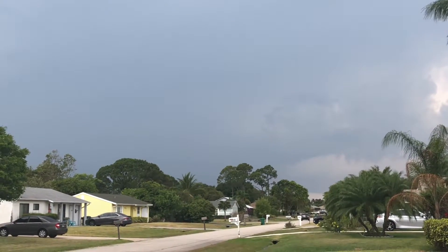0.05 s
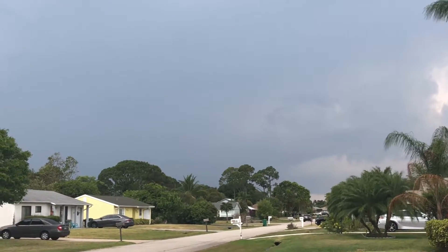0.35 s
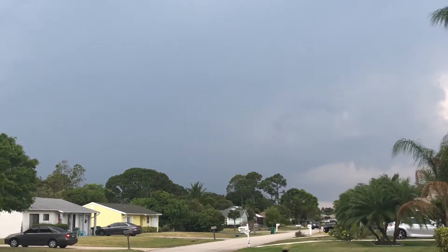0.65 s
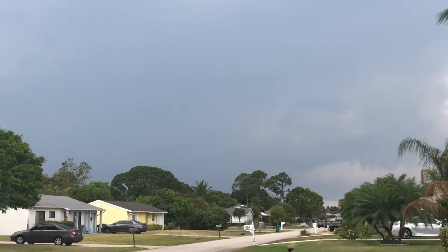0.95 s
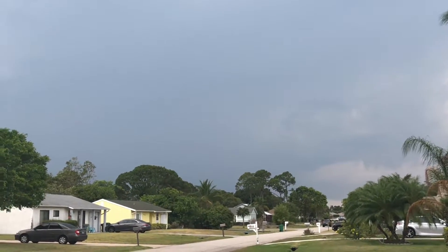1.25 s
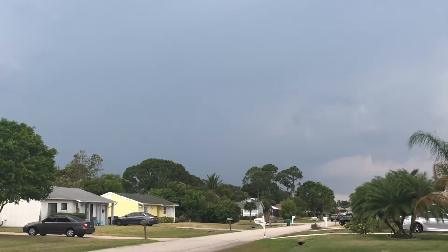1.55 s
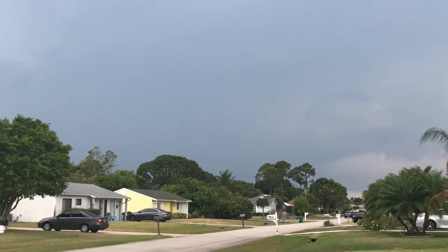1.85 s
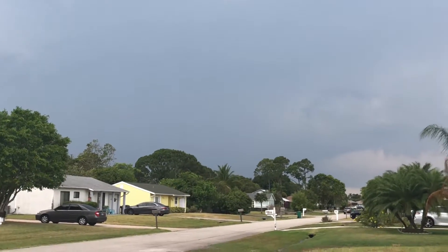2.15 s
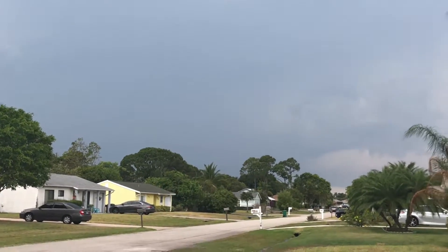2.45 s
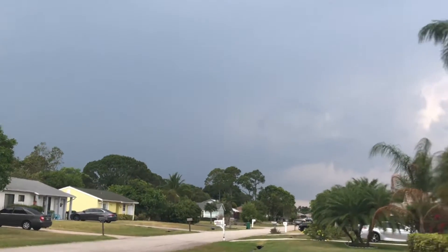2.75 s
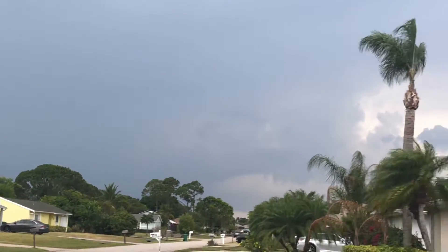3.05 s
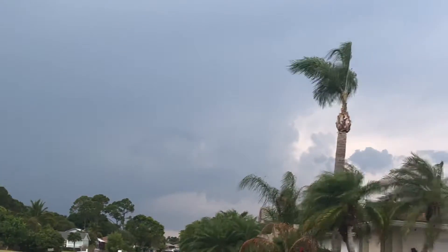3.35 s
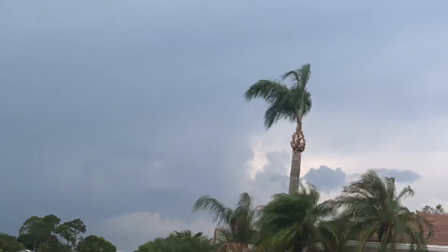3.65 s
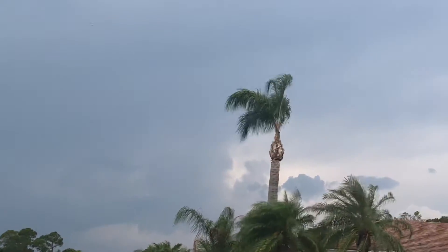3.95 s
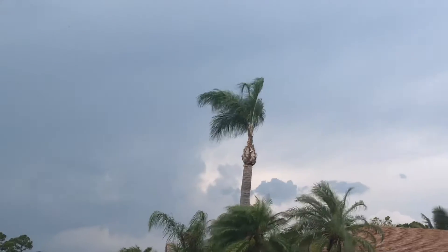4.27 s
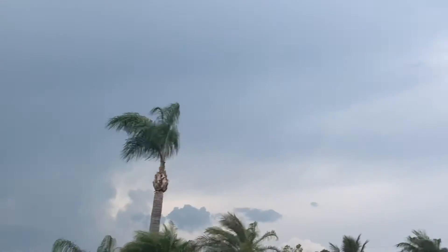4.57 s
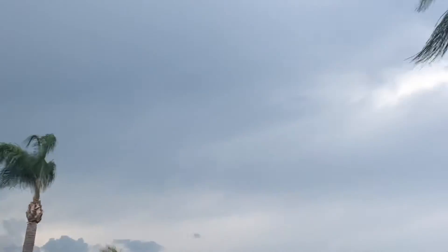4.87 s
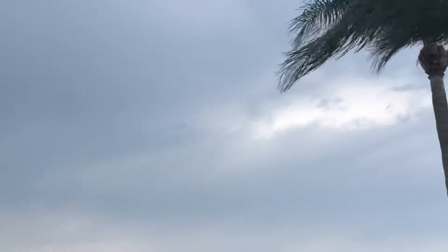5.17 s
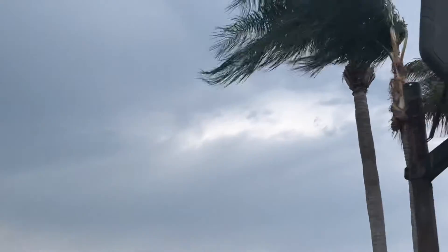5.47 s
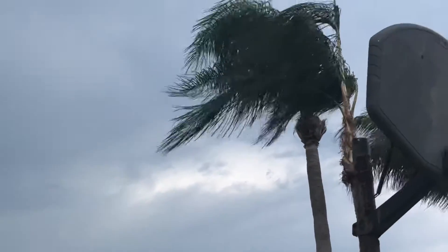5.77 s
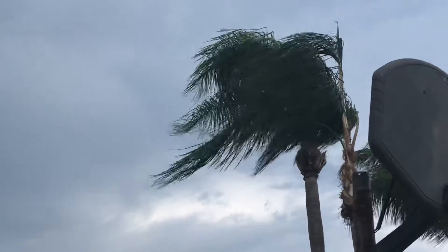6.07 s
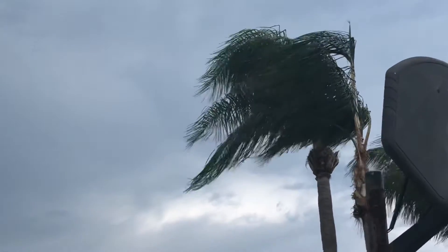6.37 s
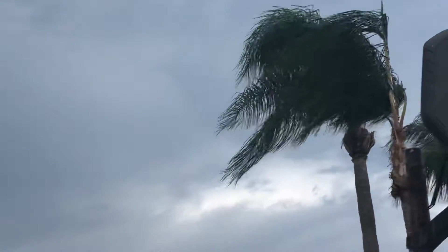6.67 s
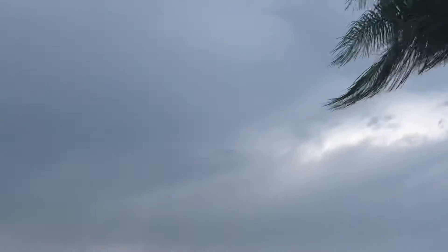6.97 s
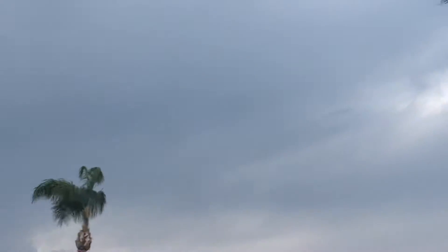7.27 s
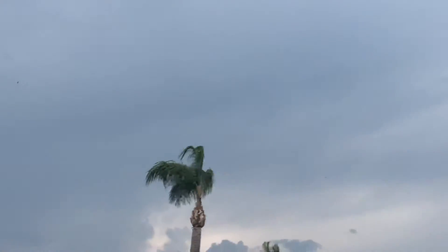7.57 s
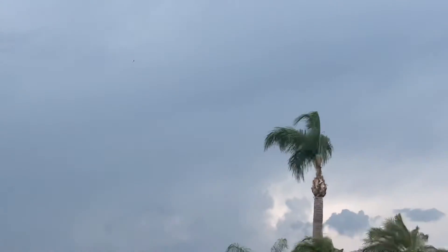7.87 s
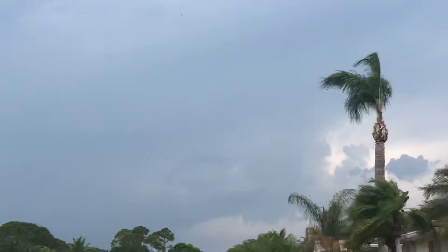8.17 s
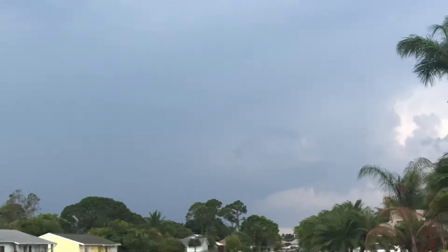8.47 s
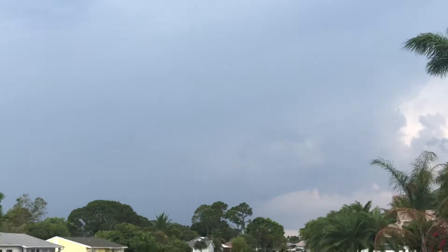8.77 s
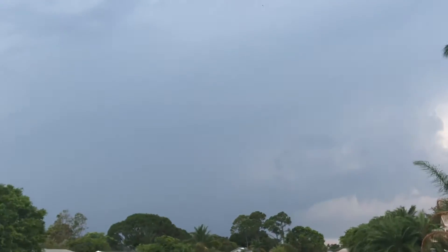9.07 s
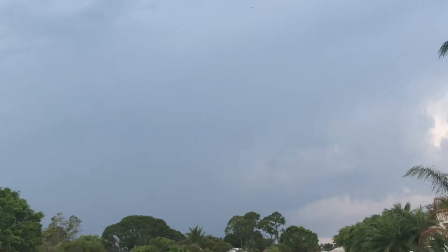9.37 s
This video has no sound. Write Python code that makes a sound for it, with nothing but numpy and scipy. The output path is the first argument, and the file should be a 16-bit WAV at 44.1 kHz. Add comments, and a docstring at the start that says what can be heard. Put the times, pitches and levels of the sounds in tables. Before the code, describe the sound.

Palm trees rustle steadily in the wind, with soft microphone flutter that builds into rough, thumping gusts and dies back.

```python
"""Storm wind on a palm-lined street, heard from a hand-held phone.
Throughout, fronds hiss and patter over the low roar of the wind; near 1 s it moans faintly.
Up to 6 s, turbulent air flutters softly across the microphone port.
From 6.5 s, hard gusts drive thumping eddies against the port while the nearest palm sizzles.
By 9 s the gusts have died back to a draught."""
import sys
import numpy as np
from scipy import signal
from scipy.fft import rfft, irfft
from scipy.io import wavfile
from scipy.ndimage import uniform_filter1d, map_coordinates

SR = 44100
rng = np.random.default_rng(int(sys.argv[2]) if len(sys.argv) > 2 else 0)


def dump(signal):
    """Clip the signal to [-1, 1] and save it as 16-bit WAV at the path in sys.argv[1]."""
    limited = np.clip(np.atleast_2d(signal).T, -1, 1)
    pcm = np.round(limited * 32767).astype(np.int16)
    wavfile.write(sys.argv[1], SR, pcm)


N = 419832
T = np.arange(N) / SR


def buffet(air_db, swirl_db=1.32, lurch_octaves=0.21, gain_db=0.85, calm_db=-59):
    """Turbulence swept past the port: faster air is louder and higher."""
    # turbulence spectrum at reference speed: freq_hz, density_db
    turbulence = [(15, -17), (45, 6), (85, 4.5), (160, 4), (280, -2), (450, -12.5), (650, -18),
                  (900, -26.5), (1300, -38.5), (2000, -74), (3000, -100)]
    speed = air_speed(air_db) * 2 ** (lurch_octaves * walk(110))  # lurching flow sputters
    pattern = colour(rng.standard_normal(2 * N), turbulence)
    pressure = port(map_coordinates(pattern, [np.cumsum(speed)], order=3, mode="wrap"))
    running_rms = np.sqrt(uniform_filter1d(pressure ** 2, size=2600) + 1e-9)
    strength = undb(air_db + gain_db + swirl_db * walk(45))
    turbulent_share = 1 / (1 + undb(calm_db - air_db) ** 2)  # flow turns smooth in near calm
    return pressure / running_rms * strength * turbulent_share


def eddies(air_db, rise_cycles=0.23, fall_cycles=0.71, slowing_per_cycle=0.35,
           strike_db=-2.0, flutter_db=-10, shred_hz=450):
    """Each eddy strikes the port with one fast, slowing swing and tears into a flutter of like pitch."""
    # distinct eddies: time_s, level_db, pitch_hz, flutter_half_length_s
    distinct = [(0.029, -34, 102, 0.01), (0.074, -37, 70, 0.0087), (0.225, -33, 131, 0.0053),
                (0.558, -29, 127, 0.0095), (0.601, -46, 318, .003), (1.078, -39, 115, 0.013),
                (2.381, -39, 137, 0.0064), (2.682, -33, 195, 0.004), (2.784, -36.5, 125.2, 0.0055),
                (2.838, -39, 224, 0.0023), (2.893, -29, 264, 0.0034), (2.898, -32, 119, 0.0055),
                (3.844, -32.5, 175, 0.005), (4.05, -37, 140, 0.0085), (5.055, -44.5, 110, .012),
                (5.145, -45, 99, .012), (5.545, -39, 124, 0.0046), (5.638, -35, 233, 0.0084),
                (5.664, -33, 206.1, 0.0059), (5.684, -32, 115, 0.0055), (5.715, -31, 256, 0.0067),
                (5.724, -29, 440, 0.0013), (5.746, -30, 216, 0.0031), (5.885, -35, 229, 0.0056),
                (5.991, -39, 138, 0.0092), (6.163, -43, 278, 0.0034), (6.218, -30, 330, 0.0024),
                (6.243, -38, 403, .009), (6.252, -26, 183.6, 0.0054), (6.409, -29, 230, 0.0038),
                (6.425, -35.5, 156, .006), (6.482, -33.5, 303, 0.0022), (6.532, -30.5, 243, .005),
                (6.551, -29, 480, .0015), (6.566, -23, 250, .004), (6.581, -13, 470, 0.0031),
                (6.605, -20, 430, .002), (6.621, -11, 559, 0.0013), (6.643, -7.5, 380, 0.0024),
                (6.662, -26, 1070, 0.00055), (6.666, -15, 497, 0.0021), (6.689, -16.5, 178, 0.0041),
                (6.698, -10.5, 933, 0.0015), (6.705, -16, 130, 0.005), (6.715, -13, 355, 0.0022),
                (6.736, -13, 230, 0.0032), (6.746, -28, 600, .003), (6.767, -20, 590, .003),
                (6.775, -11, 400, 0.0029), (6.801, -29, 125, .004), (6.821, -23, 360, 0.0058),
                (6.838, -25, 447, 0.0015), (6.848, -26, 450, 0.0017), (6.863, -15, 410, 0.0059),
                (6.879, -12, 310, 0.0034), (6.881, -24.5, 650, .004), (6.9, -15.5, 296, .005),
                (6.912, -22.5, 779.5, 0.00048), (6.916, -13.5, 240, 0.0014), (6.934, -16.5, 430, .0022),
                (6.953, -19.5, 362, 0.0066), (7.037, -28.5, 378, 0.0014), (7.066, -14.5, 480, 0.0014),
                (7.082, -20, 514, 0.0038), (7.092, -19, 435, 0.0031), (7.18, -8.5, 480, 0.0018),
                (7.215, -15, 1020, 0.00069), (7.217, -13.5, 298, 0.0049), (7.23, -12.5, 550, 0.0016),
                (7.237, -11, 600, 0.0014), (7.25, -18, 302, .003), (7.279, -18, 250.8, 0.0034),
                (7.282, -18.5, 594, 0.0067), (7.302, -19, 675, 0.003), (7.373, -20.5, 480, 0.002),
                (7.381, -14.5, 149, 0.0037), (7.397, -19, 470, 0.0016), (7.449, -23, 260.5, .004),
                (7.465, -21.5, 523, 0.00072), (7.469, -20, 240, 0.0017), (7.491, -21, 460, 0.0014),
                (7.555, -31.5, 418, 0.004), (7.563, -31, 181, 0.0045), (7.625, -30, 74.8, 0.0067),
                (7.732, -31.5, 329.4, .005), (7.774, -24, 486.7, .0016), (7.787, -19.5, 251, 0.0019),
                (7.798, -18, 100, 0.0053), (7.806, -19.5, 260, 0.0021), (8.093, -30, 399.5, 0.0039),
                (8.118, -19.5, 367, 0.0014), (8.128, -27, 125.5, 0.0044), (8.15, -29, 125.3, 0.0058),
                (8.18, -25, 364, .0014), (8.206, -33, 380, 0.0011), (8.236, -34, 430, 0.0054),
                (8.254, -15.5, 175.7, 0.0053), (8.31, -30, 417, 0.0023), (8.355, -19.5, 443, 0.0016),
                (8.368, -28.5, 451, 0.0041), (8.387, -25, 400, 0.0027), (8.407, -26, 181, 0.0047),
                (8.432, -26.5, 396, 0.01), (8.447, -22, 631.6, 0.0012), (8.449, -14.5, 293, 0.0026),
                (8.46, -26, 560, 0.0011), (8.464, -12.5, 351.6, 0.0036), (8.471, -19, 417, 0.0016),
                (8.483, -18.5, 518.4, 0.0015), (8.486, -30, 178, 0.0026), (8.504, -23.5, 251, .003),
                (8.537, -24, 275.6, 0.0056), (8.548, -30, 556, 0.0017), (8.565, -23, 457, .002),
                (8.569, -24, 260, 0.0027), (8.692, -32.5, 490, 0.002), (8.705, -21, 198.9, 0.0031),
                (8.709, -25.5, 438.5, 0.0019), (8.728, -36, 178, 0.0045), (8.748, -32, 330, 0.0021),
                (8.896, -39, 290, 0.0021), (8.941, -26, 178.7, 0.005)]
    rows = [*small_eddies(air_db), *distinct]
    shreds = unit(butterworth(rng.standard_normal(N), 4, [shred_hz / 2, shred_hz * 1.543], "band"))
    phases = rng.uniform(0, 2 * np.pi, len(rows))
    out = np.zeros(N)
    for (time_s, level_db, pitch_hz, half_s), phase in zip(rows, phases):
        near = slice(*np.searchsorted(T, [time_s - 0.04, time_s + 0.04]))
        age_s = T[near] - time_s
        cycles = age_s * pitch_hz
        bounded = np.maximum(cycles, -8)
        slowed = (1 - np.exp(-slowing_per_cycle * bounded)) / slowing_per_cycle
        envelope = 2 / (np.exp(-bounded / rise_cycles) + np.exp(bounded / fall_cycles))
        strike = envelope * np.cos(2 * np.pi * slowed + phase)
        tuned_shreds = map_coordinates(shreds, [SR * (time_s + cycles / shred_hz)], order=1, mode="wrap")
        flutter = tuned_shreds / np.cosh(age_s / half_s)
        out[near] += undb(level_db + strike_db) * strike + undb(level_db + flutter_db) * flutter
    return port(out)


def small_eddies(air_db, count=400, offset_db=-2.5, scatter_db=1.5, ceiling_db=-24,
                 reference_hz=430, scatter_octaves=0.22, flutter_cycles=0.8):
    """Rows of lesser eddies at random times, stronger and higher in faster air."""
    at = ((np.arange(count) + rng.random(count)) * N / count).astype(int)
    strength, pitch = np.clip(rng.standard_normal((count, 2)), -2, 2).T
    pitch_hz = reference_hz * air_speed(air_db[at]) * 2 ** (scatter_octaves * pitch)
    level_db = np.minimum(air_db[at] + offset_db + scatter_db * strength, ceiling_db)
    return np.column_stack([T[at], level_db, pitch_hz, flutter_cycles / pitch_hz])


def airflow_db():
    """Pressure level on the microphone: gusts ride on a draught."""
    # draught: time_s, level_db
    draught = [(0.0, -53.5), (0.7, -54), (1.6, -56.5), (2.55, -51.0), (3.1, -55.5), (4.05, -53),
               (5.4, -56.0), (5.95, -45.0), (6.5, -44.5), (7.5, -39.5), (7.94, -49.0), (8.16, -36.0),
               (8.65, -45.5), (9.03, -55.5), (9.52, -49.0)]
    # gusts: time_s, peak_db, half_length_s
    gusts = [(0.054, -46, 0.051), (0.59, -42.5, 0.065), (2.42, -50, 0.13), (2.777, -46, 0.073),
             (5.555, -44.5, 0.062), (5.699, -38, 0.067), (6.421, -41, 0.028), (6.605, -27, 0.05),
             (6.693, -22.5, 0.04), (6.79, -24.5, 0.086), (6.891, -23.5, 0.046), (6.955, -25.5, 0.02),
             (7.085, -29.5, 0.025), (7.182, -26.5, 0.029), (7.23, -23.5, 0.027), (7.28, -28, 0.038),
             (7.39, -27, 0.025), (7.458, -30, 0.043), (7.566, -35, 0.01565), (7.621, -37, 0.019),
             (7.785, -32.5, 0.042), (8.128, -32.5, 0.033), (8.367, -33, 0.063), (8.471, -29.5, 0.058),
             (8.558, -30, 0.026), (8.715, -33, 0.053), (8.945, -39.5, 0.029)]
    return 20 * np.log10(np.hypot(undb(curve(draught)), swells(gusts)))


def air_speed(air_db, reference_db=-22.5, db_per_doubling=23, slowest=0.26):
    """Relative air speed from pressure level; never zero."""
    return np.hypot(2 ** ((air_db - reference_db) / db_per_doubling), slowest)


def fronds(sway_db=0.27, flutter_db=0.43, dull_hz=2300, bright_hz=7200):
    """Air in the crowns: far trees merge into a dull rush, near blades and tips sway independently."""
    # frond hiss spectrum: freq_hz, density_db
    spectrum = [(300, -3.5), (700, 1.15), (1200, 1.33), (2000, 2.5), (2700, -0.5), (3600, -0.5), (5500, -2),
                (8000, -7), (10000, -9.5), (13000, -15), (16000, -15.5)]
    # hiss of the near crowns: time_s, level_db
    crown_levels = [(0.0, -58), (0.19, -56.5), (0.54, -59), (0.85, -54.5), (1.12, -56.3), (1.52, -53.5),
                    (1.68, -55.5), (2.12, -52.5), (2.27, -55), (2.65, -53), (3.48, -52.5), (3.68, -55),
                    (4.0, -54.5), (4.62, -52), (5.4, -54.5), (6.3, -54), (6.65, -54.5), (7.62, -54),
                    (8.2, -56), (8.5, -58.5), (8.9, -55.5), (9.52, -57)]
    # sizzle of the leaflet tips: time_s, level_db
    tip_levels = [(0, -54.5), (0.26, -54), (0.56, -56), (0.8, -53), (1.17, -53.5), (1.56, -51.5),
                  (2.3, -52), (3.4, -48.5), (3.65, -51.5), (4.42, -50.5), (4.54, -49), (6.15, -48.5),
                  (6.89, -48.5), (7.15, -50), (7.33, -47), (7.43, -49.5), (7.62, -48.5), (8.5, -54),
                  (8.94, -52.5), (9.52, -54.5)]
    # rush of the far trees: time_s, level_db
    far_levels = [(0, -57.5), (0.45, -58.5), (1.0, -56.5), (2.0, -55.5), (2.6, -54.5), (3.85, -55),
                  (4.65, -54), (6.3, -52.5), (7.9, -53), (8.55, -58), (9.52, -56.5)]
    lowpass = signal.butter(2, dull_hz, fs=SR, output="sos")
    far = signal.sosfiltfilt(lowpass, colour(rng.standard_normal(N), spectrum))
    blades = butterworth(rustle(spectrum), 2, [dull_hz, bright_hz], "band")
    tips = butterworth(rustle(spectrum), 3, bright_hz, "high")
    out = far * undb(curve(far_levels))
    for part, levels in [(blades, crown_levels), (tips, tip_levels)]:
        out += part * undb(curve(levels) + sway_db * walk(9.1) + flutter_db * walk(40))
    return out


def rustle(spectrum, patter_db=-3, scrape_decay_s=0.0075, flurry_db=0.9):
    """Air hisses while leaflets tick and rub in flurries."""
    scrape = rng.standard_normal(SR // 50) * np.exp(-T[:SR // 50] / scrape_decay_s)
    rubs = unit(signal.fftconvolve(leaflets(rate_hz=650, spread_db=1.5), scrape)[:N])
    ticks = leaflets(rate_hz=1500, spread_db=2.5)
    patter = unit(ticks + 0.5 * rubs) * undb(patter_db + flurry_db * walk(45))
    return colour(rng.standard_normal(N) + patter, spectrum)


def leaflets(rate_hz, spread_db):
    """Leaflets tick against each other, many softly, a few hard."""
    hit = rng.random(N) < rate_hz / SR
    size = undb(spread_db * np.minimum(rng.exponential(size=N), 4))
    return unit(hit * size * rng.choice([-1, 1], N))


def nearest_palm(band_hz=(5500, 10000), tick_db=2, flutter_db=2):
    """Stiff leaflets sizzle in grainy surges as gusts bend the crown."""
    # gusts through the crown: time_s, peak_db, half_length_s
    surges = [(6.4, -63, 1.2), (6.88, -61, 0.11), (7.32, -63, .06)]
    grains = rng.standard_normal(N) + undb(tick_db) * leaflets(rate_hz=1000, spread_db=2.0)
    sizzle = unit(butterworth(grains, 2, band_hz, "band"))
    return sizzle * swells(surges) * undb(flutter_db * walk(35))


def swishes(relative_width=0.67):
    """Frond brushes frond; finer leaflets sound brighter."""
    # brushes: time_s, peak_db, half_length_s, centre_hz
    brushes = [(0.17, -58, 0.014, 4800), (0.85, -65, .02, 7500), (1.412, -53, 0.0063, 4830),
               (1.535, -59, .014, 7500), (1.569, -55, .008, 4800), (2.072, -63, .014, 10500),
               (2.18, -59, .012, 6200), (4.523, -61, .014, 8500), (5.057, -57, .009, 10000),
               (5.445, -55, .007, 4200), (5.529, -57, .009, 9060), (6, -58, .012, 11000),
               (6.515, -56, .02, 5500), (6.873, -60, .018, 11500), (7.32, -60, .022, 11500),
               (8.912, -62, .012, 12000)]
    rub = leaflets(rate_hz=7500, spread_db=4)
    out = np.zeros(N)
    for time_s, peak_db, half_s, centre_hz in brushes:
        near = slice(*np.searchsorted(T, [time_s - 0.1, time_s + 0.1]))
        band_hz = [centre_hz * (1 - relative_width / 2), centre_hz * (1 + relative_width / 2)]
        envelope = undb(peak_db) * np.exp(-((T[near] - time_s) / half_s) ** 2)
        out[near] += envelope * unit(butterworth(rub[near], 2, band_hz, "band"))
    return out


def twisting(x, flare_db=0.85, rate_hz=48, patch_hz=2100, full_depth_hz=7000):
    """Fronds twist in and out of the stream, each flaring in its own part of the treble."""
    freq_hz, time_s, bands = signal.stft(x, SR, nperseg=256)
    grid = np.meshgrid(freq_hz / patch_hz, time_s * rate_hz, indexing="ij")
    flare = unit(map_coordinates(rng.standard_normal((64, 1024)), grid, order=2, mode="wrap"))
    depth_db = flare_db * np.minimum(freq_hz / full_depth_hz, 1)[:, None]
    return signal.istft(bands * undb(depth_db * flare), SR)[1][:N]


def hand_echo(x, comb_spacing_hz=4000, share=0.086):
    """Tree sound glances off the hand, rippling its colour as the phone turns."""
    # aim at the tall palms: time_s, facing_0_to_1
    aim = [(0, 0.05), (2.4, 0.03), (3.25, 0), (4.3, 0.12), (4.7, 0.55), (5.5, 1), (7.5, 0.9), (8.4, 0.2)]
    echo = map_coordinates(x, [np.arange(N) - SR / comb_spacing_hz], order=3, mode="nearest")
    return x + share * curve(aim) * echo


def roar(level_db=-54.5, swell_db=1.5):
    """Wind rumbles over roofs and far trees."""
    # roar spectrum: freq_hz, density_db
    spectrum = [(20, -22), (50, -9), (90, 1), (150, -2), (250, -5), (380, -13.5), (600, -17.5), (1200, -47),
                (3000, -42)]
    return port(colour(rng.standard_normal(N), spectrum)) * undb(level_db + swell_db * walk(14))


def moan(band_hz=(285, 395)):
    """Wind hums briefly in a narrow band."""
    # hollow moans: time_s, peak_db, half_length_s
    moans = [(0.6, -63, 0.047), (0.92, -61, 0.13)]
    return unit(butterworth(rng.standard_normal(N), 2, band_hz, "band")) * swells(moans)


def port(x, edge_hz=53):
    """Bass roll-off of the microphone."""
    return butterworth(x, 4, edge_hz, "high")


def butterworth(x, order, edges_hz, kind):
    """Causal Butterworth filter."""
    return signal.sosfilt(signal.butter(order, edges_hz, kind, fs=SR, output="sos"), x)


def colour(x, spectrum):
    """Filter by (freq_hz, gain_db) points; rms 1."""
    points_hz, points_db = np.transpose(spectrum)
    freq_hz = np.maximum(np.arange(len(x) // 2 + 1) * SR / len(x), 1)
    gain_db = np.interp(np.log(freq_hz), np.log(points_hz), points_db)
    return unit(irfft(rfft(x) * undb(gain_db), len(x)))


def swells(rows):
    """Gain of bell-shaped swells, summed in power."""
    bells = (undb(peak_db) * np.exp(-((T - time_s) / half_s) ** 2) for time_s, peak_db, half_s in rows)
    return np.sqrt(sum(bell ** 2 for bell in bells))


def curve(rows):
    """(time_s, value) rows interpolated to every sample."""
    return np.interp(T, *np.transpose(rows))


def walk(rate_hz):
    """Smooth random drift; rms 1."""
    steps = rng.standard_normal(N // 10)
    return unit(map_coordinates(steps, [T * rate_hz], order=3, mode="wrap"))


def undb(db):
    """Decibels to gain."""
    return 10 ** (np.asarray(db) / 20)


def unit(x):
    """Scale to rms 1."""
    return x / np.sqrt(np.mean(x ** 2))


def scene():
    """Wind on the microphone in front of trees and far roar; mono."""
    air_db = airflow_db()
    trees = twisting(fronds() + nearest_palm()) + swishes()
    street = hand_echo(trees) + roar() + moan()
    return (street + buffet(air_db) + eddies(air_db))[None]


def record(dry, top_hz=15720):
    """The phone cuts the top treble."""
    return signal.sosfilt(signal.ellip(12, 0.1, 80, top_hz, fs=SR, output="sos"), dry)


dry = scene()
out = record(dry)
dump(out)
```